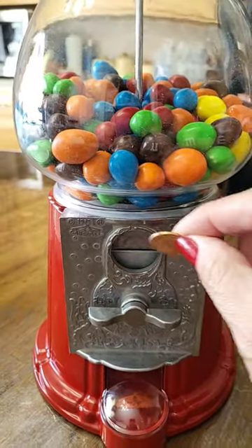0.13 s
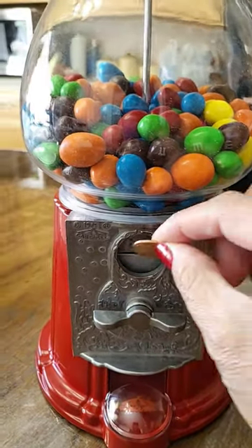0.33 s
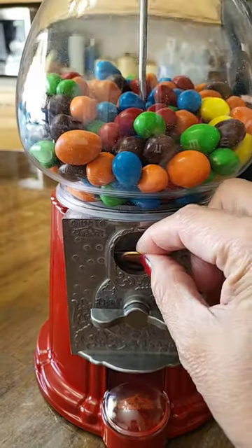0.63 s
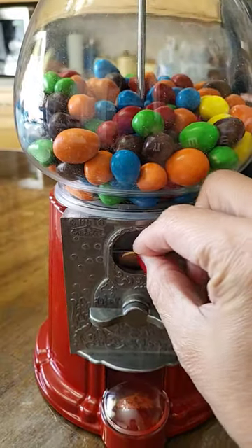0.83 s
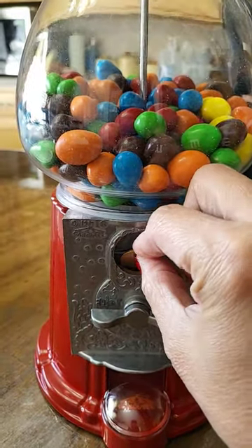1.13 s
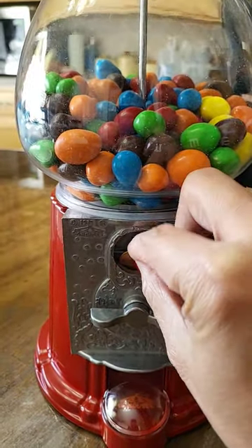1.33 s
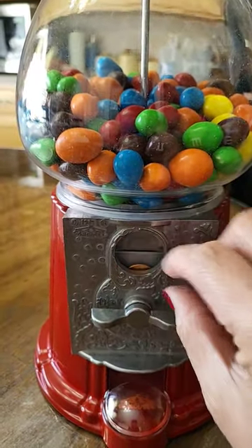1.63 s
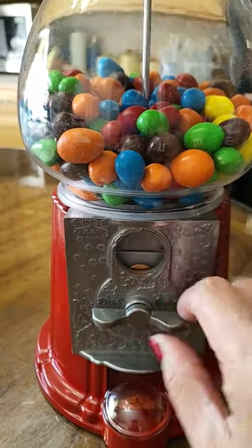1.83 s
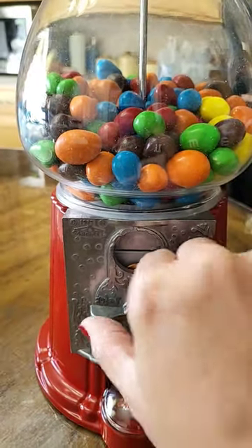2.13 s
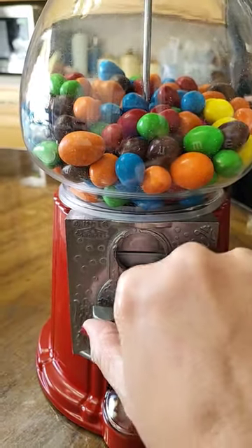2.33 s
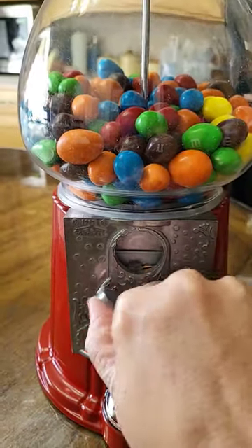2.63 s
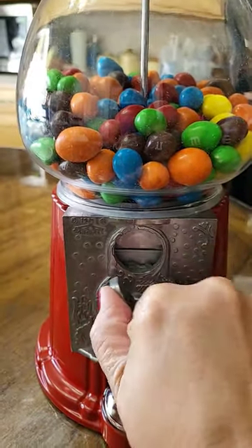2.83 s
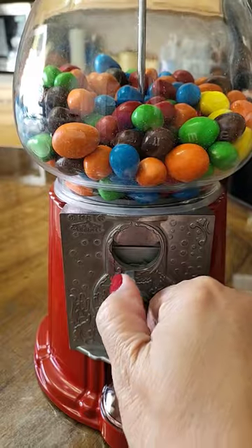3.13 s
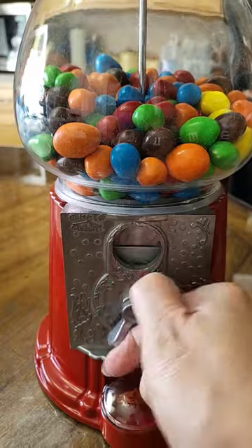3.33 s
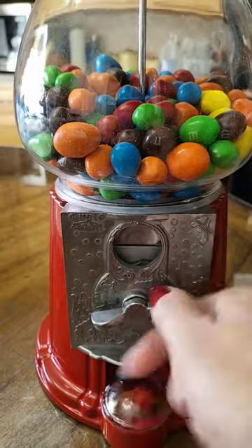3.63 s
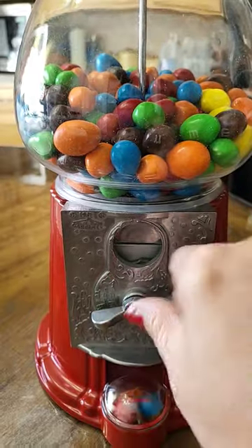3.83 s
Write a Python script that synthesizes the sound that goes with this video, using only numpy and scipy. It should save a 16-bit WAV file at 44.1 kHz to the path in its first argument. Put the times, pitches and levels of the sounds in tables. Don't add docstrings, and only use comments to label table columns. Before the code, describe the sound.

A coin taps a metal slot, drops with bright bouncing clinks, then a ratcheting handle snaps hard and sweets clatter down the chute; close stereo microphone, quiet room with faint hum.

```python
import sys
import numpy as np
from scipy import signal
from scipy.fft import rfft, irfft, next_fast_len
from scipy.io import wavfile
from scipy.ndimage import uniform_filter1d, map_coordinates

SR = 44100
rng = np.random.default_rng(int(sys.argv[2]) if len(sys.argv) > 2 else 0)


def dump_mix(stems):
    frames = np.atleast_2d(stems).T
    limited = np.clip(frames, -1, 1)
    pcm = np.round(limited * 32767).astype(np.int16)
    wavfile.write(sys.argv[1], SR, pcm)


def boost_factor(decibels):
    exponent = np.asarray(decibels, float) / 20
    return 10 ** exponent


N = 176400

# (frequency [Hz], correlation [1])
LIKENESS = [(60, 0.83), (250, 1), (900, 0.83), (4000, 0.62), (12000, 0.35)]
# (frequency [Hz], level [dB])
METAL_SPECTRUM = [(410, -33), (700, -8.5), (1240, -5.5), (2070, -4.5), (13200, -5.5), (15700, -2),
                  (16500, -49.5)]
# (frequency [Hz], level [dB])
CHUTE_SPECTRUM = [(410, -30), (760, -15), (1100, -17.5), (1550, -13), (2070, -7), (13200, -6.5),
                  (15700, -11.5), (16500, -50.5)]
# (frequency [Hz], bandwidth [Hz], level [dB])
PLATE_MODES = [(1950, 42, -4), (2510, 36, 9.5), (3070, 17, 2), (3380, 35, 4.5), (4300, 27, -6),
               (4700, 33, -2), (6400, 44, 1)]
# (frequency [Hz], bandwidth [Hz], level [dB])
CASTING_MODES = [(667, 89, 4), (1140, 160, -15), (2040, 34, 5), (2510, 17, 1.5), (4110, 26, 3),
                 (4875, 43, 6.5), (7100, 290, 4.5), (12400, 110, -13)]
# (frequency [Hz], bandwidth [Hz], level [dB])
CHUTE_MODES = [(1120, 90, 8), (2050, 66, 2), (2560, 62, 4), (2940, 40, -3), (4170, 52, 7), (4900, 70, 4),
               (6900, 160, 1.5), (12400, 200, -6.5)]


def unit(x):
    return x / np.sqrt(np.mean(x ** 2) + 1e-20)


def along(points, hz):
    f, v = np.transpose(points)
    return np.interp(np.log(hz + 1), np.log(f + 1), v)


def wobble(rate):
    knots = rng.standard_normal(int(N * rate / SR) + 4)
    return map_coordinates(knots, [np.arange(N) * rate / SR])


def resonance(f, hz, width):
    return 1j * f * width / (hz * hz - f * f + 1j * f * width)


def causal(gain):
    cepstrum = irfft(np.log(gain + 1e-6))
    half = len(cepstrum) // 2
    cepstrum[1:half] *= 2
    cepstrum[half + 1:] = 0
    return np.exp(rfft(cepstrum))


def paired(z, f, likeness):
    angle = np.arccos(np.clip(along(likeness, f), -1, 1)) / 2
    common = np.cos(angle) * z[0]
    opposed = np.sin(angle) * z[1]
    return np.array([common + opposed, common - opposed])


def room_tone():
    # (frequency [Hz], level [dB])
    air_spectrum = [(25, -26), (60, -7), (250, -1.5), (540, -3.5), (900, -20), (3500, -31), (6500, -21.5),
                    (16000, -38.5)]
    # (frequency [Hz], correlation [1])
    air_likeness = [(60, 0.9), (380, 0.3), (2380, -0.33), (15000, 0.18)]
    # (frequency [Hz], bandwidth [Hz], level [dB])
    rumble_bands = [(61.7, 7.3, -71.5), (127, 28, -80.5)]
    # (frequency [Hz], level [dB])
    motor_tones = [(306.8, -71.5), (436.0, -68)]
    m = next_fast_len(N)
    f, t = np.fft.rfftfreq(m, 1 / SR), np.arange(N) / SR

    def shaped_noise(gain):
        white = rfft(rng.standard_normal((2, m)))
        return unit(irfft(paired(white, f, air_likeness) * gain, m)[:, :N])

    air = boost_factor(-65.5 + 0.6 * wobble(3.8)) * shaped_noise(boost_factor(along(air_spectrum, f)))
    rumble = sum(boost_factor(db) * shaped_noise(resonance(f, hz, w) ** 2) for hz, w, db in rumble_bands)
    hum = 0
    for hz, db in motor_tones:
        sway = boost_factor(db + 4.5 + 1.5 * wobble(2.1))
        phase_drift = 0.44 * wobble(4.1)
        hum = hum + sway * np.sin(2 * np.pi * hz * t + phase_drift)
    return air + rumble + hum


def room(dry, wet_db):
    # (frequency [Hz], time to fall 60 dB [s])
    decay_times = [(150, 0.55), (1500, 0.43), (8000, 0.39), (14000, 0.27)]
    m = SR // 2
    band, t, z = signal.stft(rng.standard_normal((2, m)), SR, nperseg=256)
    fading = z * boost_factor(-60 * t / along(decay_times, band)[:, None])
    tail = signal.istft(fading, SR, nperseg=256)[1][:, :m]
    tail = irfft(paired(rfft(tail), np.fft.rfftfreq(m, 1 / SR), LIKENESS), m)
    tail = np.pad(tail / np.linalg.norm(tail[0]), ((0, 0), (260, 0)))
    return dry + boost_factor(wet_db) * signal.fftconvolve(dry, tail, axes=1)[:, :N]


def add(out, s, sound):
    part = out[:, max(round(s * SR), 0):][:, :sound.shape[1]]
    part += sound[:, :part.shape[1]]


def peak_one(v):
    return v / np.sqrt(uniform_filter1d((v ** 2).mean(0), 200).max())


def voiced(push, soft, spectrum, modes, hz, low_db, dull_hz):
    # (frequency [Hz], bandwidth [Hz], level [dB])
    body_modes = [(62.5, 15.6, -2), (126, 9.8, -5.5), (212.2, 45, -3), (289.7, 119, 2)]
    m = push.shape[1]
    f = np.fft.rfftfreq(m, 1 / SR)
    luck = rng.standard_normal(size=(3, 2, 10))

    part_rings = 0
    for k, (centre, w, db) in enumerate(modes):
        scattered = boost_factor(db + 4.5 * luck[0, :, k, None])
        part_rings = part_rings + scattered * abs(resonance(f, centre, w))
    loose_hz = np.clip(5000 * np.exp(0.62 * luck[2, 0]), 900, 15000)
    loose = sum(abs(resonance(f, c, c / 64)) for c in loose_hz)
    own_ring = abs(resonance(f, hz, hz / 8.4))
    rings = 1 + boost_factor(2.5) * part_rings + boost_factor(0.5) * loose + boost_factor(8) * own_ring

    lag_s = 0.000309 * (1 + 0.44 * luck[2, 1, 0])
    lag = np.exp(1j * 2 * np.pi * f * lag_s * [[.5], [-.5]])
    softness = 1 + (f / dull_hz) ** 2
    metal = lag * np.array([causal(boost_factor(along(spectrum, f)) * side / softness) for side in rings])

    thud = 0.00064
    for k, (centre, w, db) in enumerate(body_modes):
        thud = thud + boost_factor(db + 1.7 * luck[1, 0, k]) * abs(resonance(f, centre, w)) ** 2
    ringing = irfft(paired(rfft(push), f, LIKENESS) * metal, m)
    thudding = irfft(paired(rfft(soft), f, LIKENESS) * causal(thud), m)
    return peak_one(ringing) + boost_factor(low_db) * peak_one(thudding)


def knocks(rows, spectrum, modes, rattle_db):
    crack_t60_s, rattle_t60_s, rise_s = 0.02, 0.12, 0.00027
    size = 8192
    out, t = np.zeros((2, N)), np.arange(size) / SR
    for s, db, hz, low_db, contact_ms in rows:
        after = np.maximum(t - .001 - contact_ms / 1000, 0)
        start = 1 - np.exp(-np.maximum(t - .001, 0) / rise_s)
        crack = boost_factor(-60 * after / crack_t60_s)
        rattle = boost_factor(rattle_db - 60 * after / rattle_t60_s)
        noise = rng.standard_normal((2, 2, size))
        push = noise[0] * abs(noise[0]) ** 0.29 * start * (crack + rattle)
        soft = noise[1] * boost_factor(-60 * after / 0.035)
        dull_hz = min(5000 * np.exp(0.064 * (db + 29)), 5.64 * hz)
        sound = voiced(push, soft, spectrum, modes, hz, low_db, dull_hz)
        add(out, s - .0015, boost_factor(db - 9) * sound)
    return out


def rubs():
    # (start [s], length [s], rms level [dB], roughest band [Hz], low creak [dB])
    strokes = [(.002, 0.07, -69.5, 2300, -8), (0.531, 0.13, -66.5, 1950, -6),
               (0.585, 0.087, -52.5, 5960, -11.5), (0.587, 0.037, -51.5, 2000, -33),
               (0.71, .15, -60, 4230, -20), (1.366, 0.092, -62, 5000, -4), (1.59, 0.13, -57, 3874, -6.5),
               (2.516, 0.58, -67.5, 1500, 1), (2.959, 0.15, -60.5, 2090, 8.5),
               (3.501, 0.317, -39.5, 5000, -6.5), (3.807, 0.42, -45, 2440, -7.5)]
    rise_s, fall_s, grains_per_s, grain_spread_db = 0.015, 0.013, 13000, 5
    coin_in_s, sweets_out_s = 1.5, 3.4
    size = 20480
    out, t = np.zeros((2, N)), np.arange(size) / SR
    for s, length, db, hz, low_db in strokes:
        release = np.exp(-np.maximum(t - length, 0) / fall_s)
        stroke = np.clip(t / rise_s, 0, 1) * release * np.exp(-t / length / 2)
        chance = rng.random((2, size))
        sizes = boost_factor(-grain_spread_db * np.log(chance[1] + 0.00066))
        grains = (chance[0] < grains_per_s / SR) * sizes
        roughness = unit(uniform_filter1d(grains, size=40) + 0.015)
        push = stroke * roughness * rng.standard_normal((2, 2, size))
        if s < coin_in_s:
            spectrum, modes = METAL_SPECTRUM, PLATE_MODES
        elif s < sweets_out_s:
            spectrum, modes = METAL_SPECTRUM, CASTING_MODES
        else:
            spectrum, modes = CHUTE_SPECTRUM, CHUTE_MODES
        sound = voiced(push[0], push[1], spectrum, modes, hz, low_db, dull_hz=1.5 * hz)
        add(out, s, boost_factor(db + 4.5) * sound)
    return room(out, wet_db=-13.0)


def pings():
    # (time [s], frequency [Hz], peak level [dB], time to fall 60 dB [s], left over right [dB])
    ringing_parts = [(1.043, 2390, -68, 0.38, -2.5), (1.434, 2510, -60.5, 0.37, 4.5),
                     (2.694, 2027, -22, 0.04, 1), (2.801, 776, -32.5, 0.017, 10),
                     (3.025, 276, -36.5, 0.14, 6), (3.056, 306.5, -28, 0.15, 3.5),
                     (3.057, 1550, -37.5, 0.035, -3), (3.136, 1094, -52.5, 0.029, -2),
                     (3.255, 670, -52, 0.063, 1), (3.432, 1550, -31, 0.061, 0),
                     (3.648, 12880, -11, 0.046, 4.5), (3.649, 1120, -21.5, 0.02, -1.5),
                     (3.674, 1097, -29.5, 0.051, -4), (3.711, 1053, -25.5, 0.053, -3),
                     (3.751, 13020, -11, .035, 13), (3.772, 1068, -22, 0.02, -1),
                     (3.752, 47, -35, 0.13, -10), (3.54, 62.2, -38.5, .2, -3),
                     (3.796, 7100, -25.5, 0.041, -7), (3.799, 1075, -28, 0.052, 3),
                     (3.818, 1104, -32, 0.053, -6)]
    size = 12000
    out, t = np.zeros((2, N)), np.arange(size) / SR
    for s, hz, db, t60, pan_db in ringing_parts:
        drift = unit(uniform_filter1d(rng.standard_normal((2, size)), size=120))
        drift = drift * 0.33 * np.sqrt(hz / 5000)
        fade = (1 - np.exp(-t / .001)) * boost_factor(db - 60 * t / t60)
        sides = boost_factor(pan_db * np.array([[.5], [-.5]]))
        add(out, s, fade * sides * np.sin(2 * np.pi * hz * t + drift))
    return out


def ticks_and_pings():
    # (time [s], peak level [dB], ring [Hz], thud [dB], contact [ms])
    edge_ticks = [
        (1.0161, -46, 5850, -35, 1.5),
        (1.29, -52.5, 6960, -31, 1.3),
        (3.2846, -55, 7600, -22, 5.1),
    ]
    # (frequency [Hz], level [dB])
    tick_spectrum = [(1500, -42), (3500, -16.5), (5500, 0), (8000, 7.5), (11000, -25), (16000, -22)]
    ticks = knocks(edge_ticks, tick_spectrum, PLATE_MODES, rattle_db=-11.5)
    return room(ticks + pings(), wet_db=-18.5)


def coin_taps():
    # (time [s], peak level [dB], ring [Hz], thud [dB], contact [ms])
    slot_taps = [
        (0.6951, -21.5, 3460, -27.5, 1.3),
        (0.83, -35.5, 5330, -34, 0.86),
        (0.9265, -31, 3870, -37, 0.68),
        (1.3907, -39, 5230, -22.5, 1.2),
        (1.4303, -27, 2640, -22.5, 3.7),
    ]
    # (frequency [Hz], level [dB])
    tap_spectrum = [(530, -51.5), (900, -19), (2470, -11), (4860, 1), (16000, -21)]
    return room(knocks(slot_taps, tap_spectrum, PLATE_MODES, rattle_db=-24.5), wet_db=-14.5)


def coin_drop():
    # (time [s], peak level [dB], brightest ring [Hz], thud [dB], contact [ms])
    coin_contacts = [
        (1.6114, -26, 4800, -26, 1.5),
        (1.6375, -9.5, 7760, -19, 2.8),
        (1.6773, -20.5, 3600, -11.5, 3.4),
        (1.6986, -12.5, 5940, -19, 1.4),
        (1.729, -17.5, 3750, -18, 1.2),
        (1.7479, -21, 5900, -23.5, 1.7),
        (1.7659, -26, 4300, -11, 1.2),
        (1.897, -36.5, 3250, -4.5, 6.2),
        (1.926, -42.5, 4500, -15, 1.5),
    ]
    # (frequency [Hz], level [dB])
    coin_spectrum = [(410, -42.5), (700, -4.5), (8980, 1), (14000, 3.5), (16500, -29.5)]
    return room(knocks(coin_contacts, coin_spectrum, CASTING_MODES, rattle_db=-11), wet_db=-11)


def handle_turn():
    # (time [s], peak level [dB], brightest ring [Hz], thud [dB], contact [ms])
    ratchet = [(2.2095, -37.5, 2190, -11, 3), (2.5249, -47.5, 2200, -2, 6.9),
               (2.5678, -38.5, 2020, -6.5, 4.2), (2.616, -40, 4700, 0, 3), (2.6389, -40.5, 2080, -7, 5.9),
               (2.6948, -10, 2040, -18, 1.5), (2.8, -23, 7200, -11, 4), (3.024, -34, 2040, -12, 3),
               (3.054, -36, 4830, 10.5, 8.9), (3.1146, -54, 3120, -5, 2.1), (3.3345, -7, 6010, -9.5, 5.4),
               (3.3468, -5.5, 2140, -11.5, 2.7), (3.359, -19, 2170, -6.5, 4.1),
               (3.4294, -10, 6290, -16.5, 3.6)]
    # (time [s], peak level [dB], ring [Hz], thud [dB], contact [ms])
    clunks = [
        (0.089, -42.5, 4500, -1, 2.3),
        (2.689, -22, 4700, -11.5, 2.7),
        (3.421, -18.5, 12300, -33, 1.6),
        (3.546, -6, 653, -14.5, 2.6),
    ]
    contacts = [*ratchet, *clunks]
    return room(knocks(contacts, METAL_SPECTRUM, CASTING_MODES, rattle_db=-11.5), wet_db=-8)


def sweets_tumble():
    # (time [s], peak level [dB], ring [Hz], thud [dB])
    sweet_hits = [(3.4984, -11, 1980, -14), (3.5256, -2, 5310, -21), (3.5527, -2.5, 5610, -20.5),
                  (3.5792, -11.5, 2860, -28), (3.6102, -28.5, 7530, -30), (3.6282, 0, 5340, -36.5),
                  (3.6471, -4, 2000, -27.5), (3.673, -5, 9510, -27), (3.703, -10, 3210, -33),
                  (3.711, -7.5, 2510, -26.5), (3.725, -2, 5180, -27.5), (3.7384, -15, 2510, -13.5),
                  (3.7504, -4.5, 7900, -28.5), (3.7727, -4, 5110, -28.5), (3.813, -10, 3800, -26),
                  (3.8431, -17.5, 2510, -25.5), (3.869, -13, 4000, -28), (3.8961, -16, 7100, -20),
                  (3.9111, -16.5, 4300, -32), (3.9295, -17, 7460, -26), (3.9447, -15, 2660, -43),
                  (3.9692, -21, 4170, -27),
                  (3.521, -21.5, 9000, -30), (3.539, -13.5, 3060, -3), (3.565, -11.5, 6250, -13),
                     (3.638, -19, 5510, -38.5), (3.69, -22, 4500, -33), (3.8002, -19.5, 3030, -10),
                     (3.8342, -25.5, 4070, -21.5), (3.9049, -21, 7340, -29), (3.953, -24.5, 3580, -11),
                     (3.981, -22.5, 2800, -24), (3.995, -25, 2700, -28.5)]
    contact_ms = 1.8
    rows = [(s, db, hz, low_db + 3.0, contact_ms) for s, db, hz, low_db in sweet_hits]
    return room(knocks(rows, CHUTE_SPECTRUM, CHUTE_MODES, rattle_db=-6.5), wet_db=-8.5)


def scene():
    background = room_tone() + rubs() + ticks_and_pings()
    return background + coin_taps() + coin_drop() + handle_turn() + sweets_tumble()


def roll_off(x):
    return signal.sosfilt(signal.butter(12, 16690, fs=SR, output="sos"), x)


def record(dry):
    # (frequency [Hz], left over right [dB])
    port_balance = [(40, -3.5), (200, -3), (700, -7), (2000, -1), (12000, 0.5)]
    f = np.fft.rfftfreq(N, 1 / SR)
    sides = boost_factor(along(port_balance, f) * [[.5], [-.5]])
    ports = irfft(rfft(dry) * sides, N)
    return roll_off(np.tanh(ports))


dry = scene()
out = record(dry)
dump_mix(out)
```